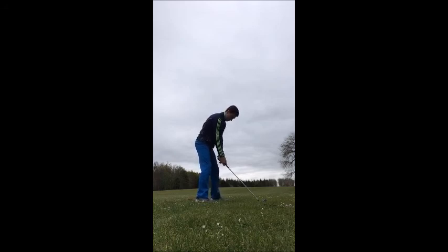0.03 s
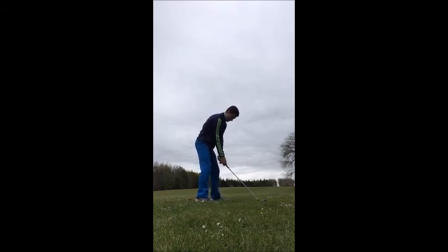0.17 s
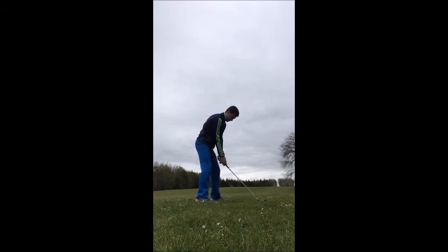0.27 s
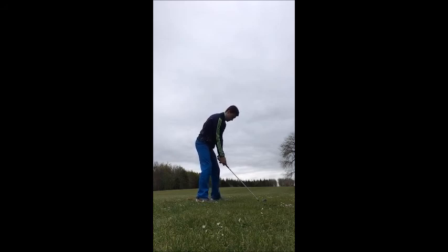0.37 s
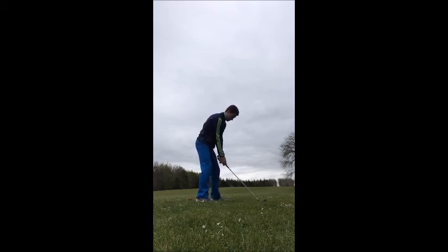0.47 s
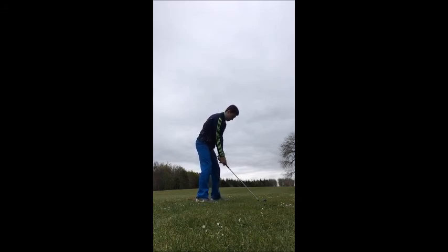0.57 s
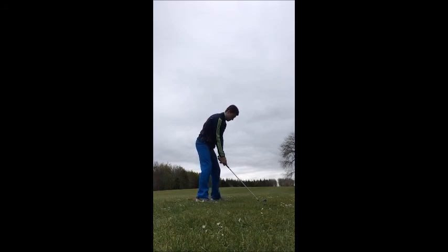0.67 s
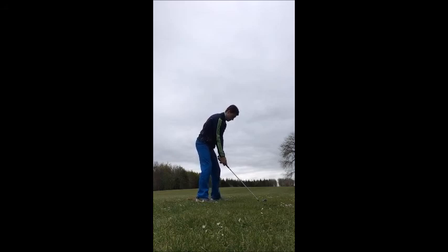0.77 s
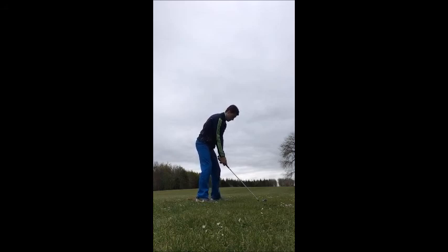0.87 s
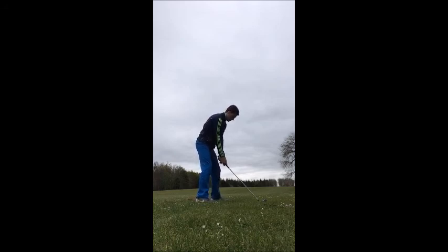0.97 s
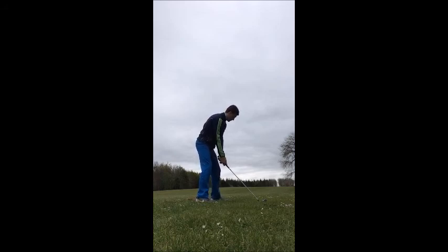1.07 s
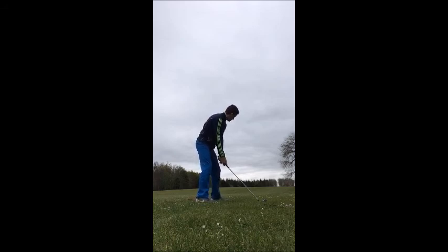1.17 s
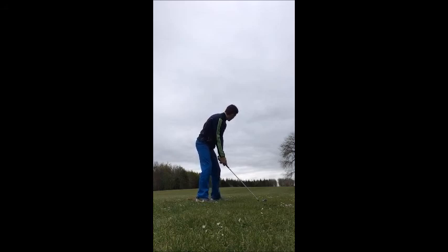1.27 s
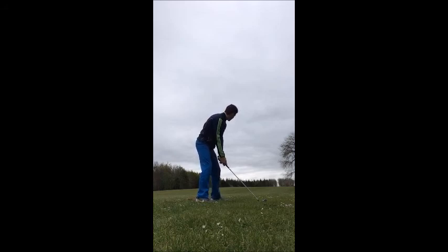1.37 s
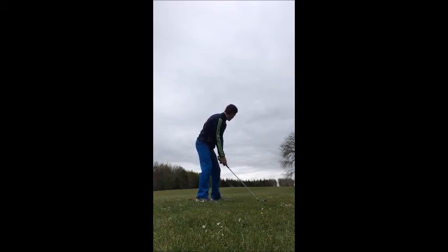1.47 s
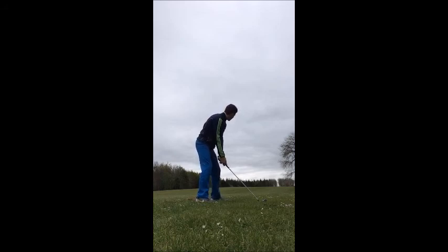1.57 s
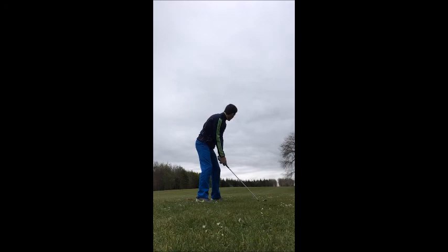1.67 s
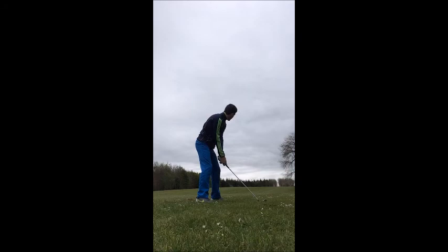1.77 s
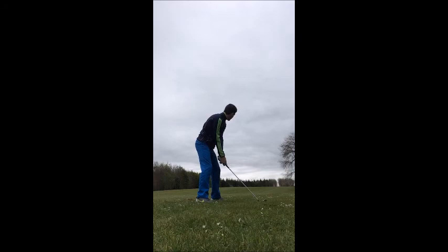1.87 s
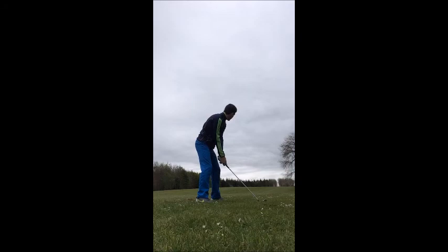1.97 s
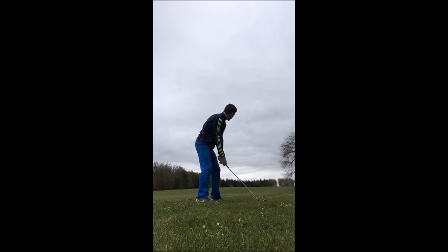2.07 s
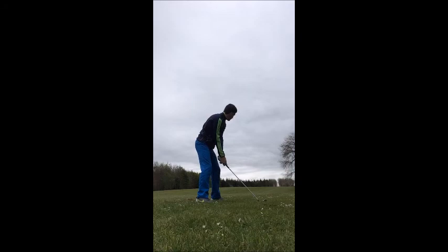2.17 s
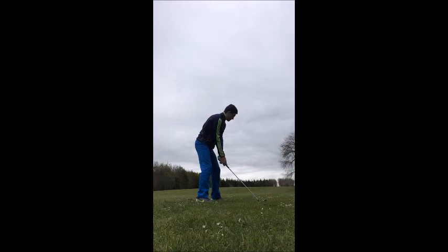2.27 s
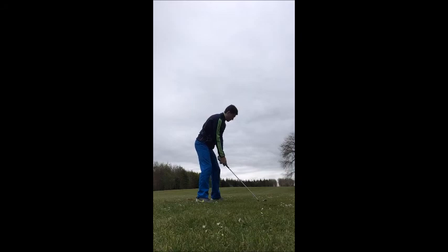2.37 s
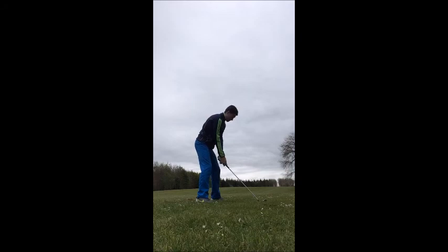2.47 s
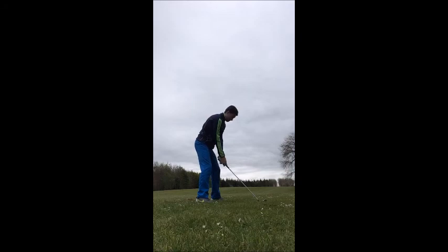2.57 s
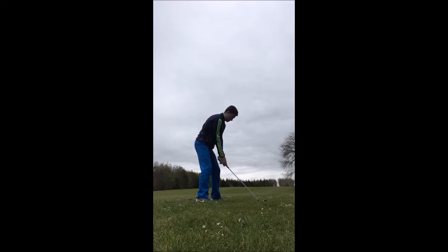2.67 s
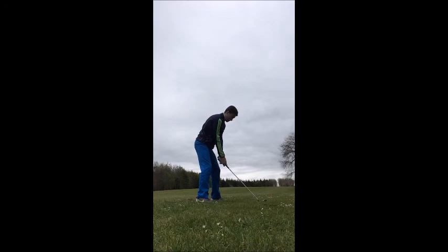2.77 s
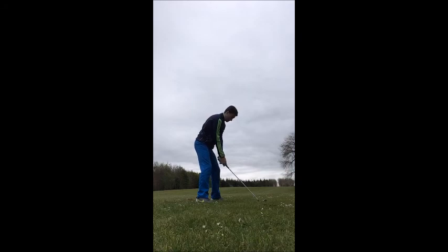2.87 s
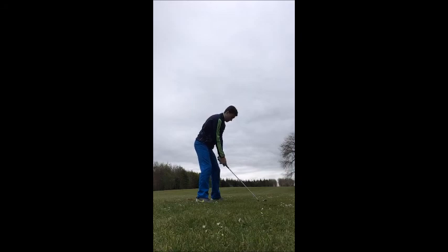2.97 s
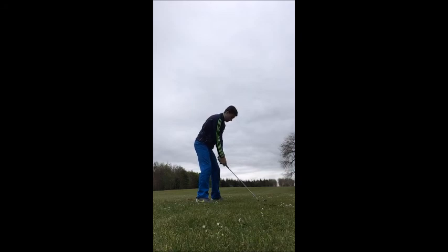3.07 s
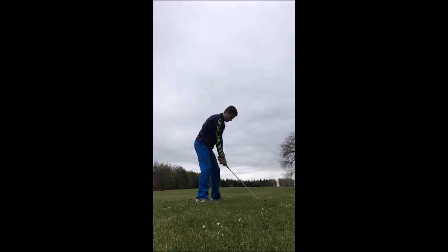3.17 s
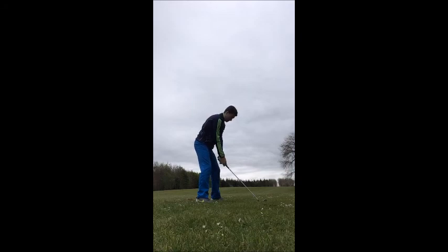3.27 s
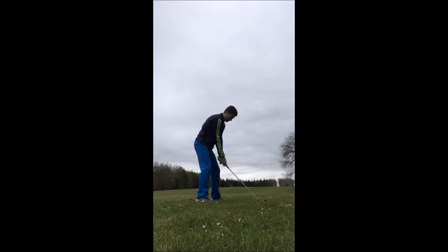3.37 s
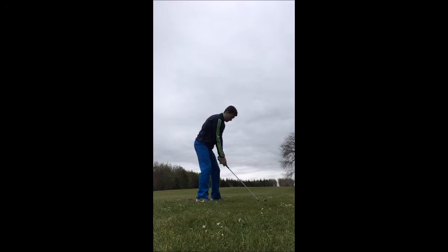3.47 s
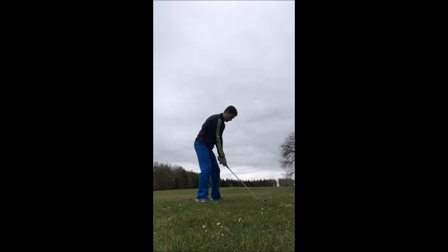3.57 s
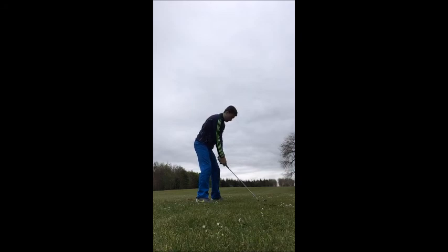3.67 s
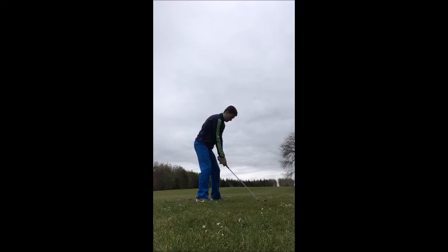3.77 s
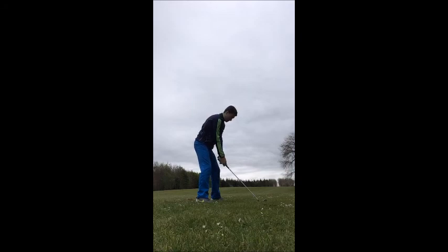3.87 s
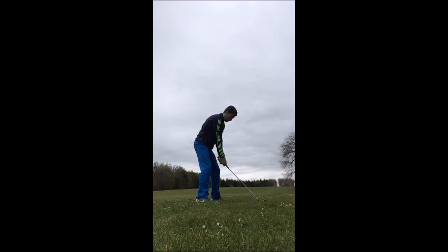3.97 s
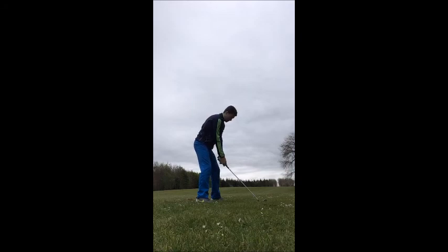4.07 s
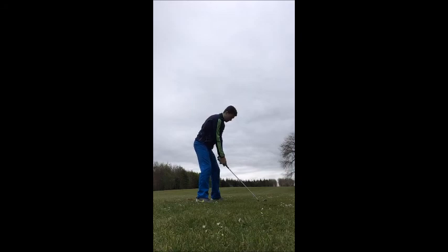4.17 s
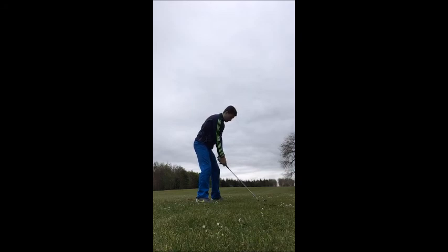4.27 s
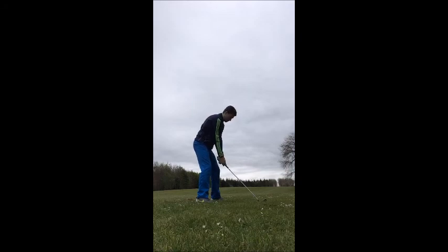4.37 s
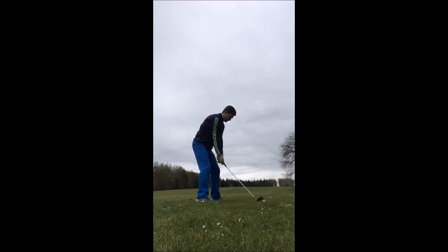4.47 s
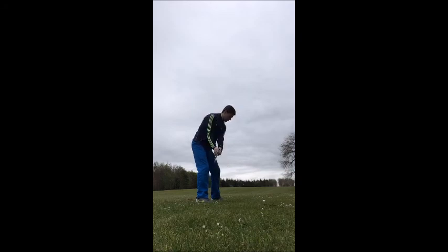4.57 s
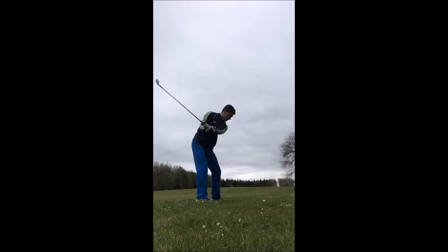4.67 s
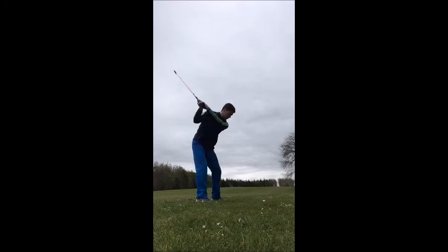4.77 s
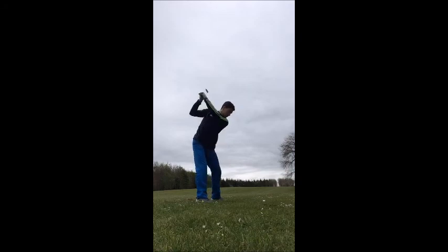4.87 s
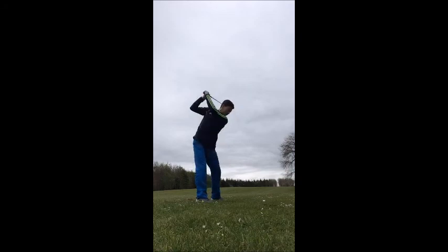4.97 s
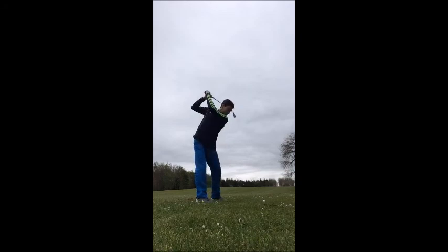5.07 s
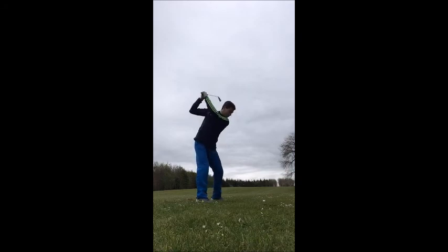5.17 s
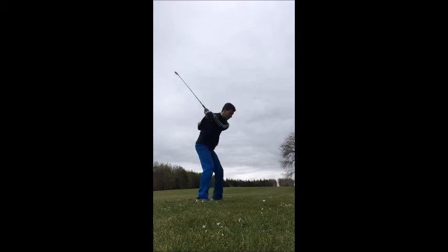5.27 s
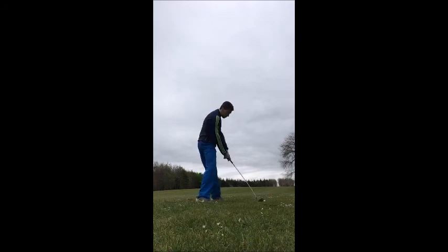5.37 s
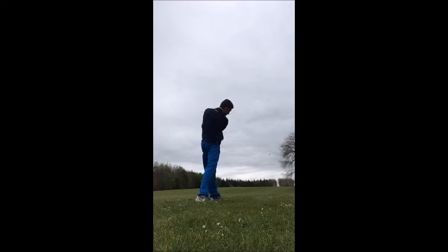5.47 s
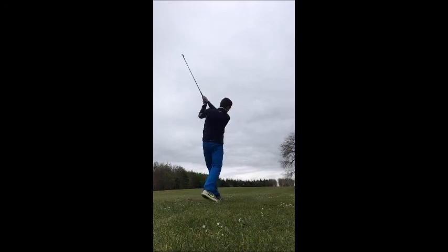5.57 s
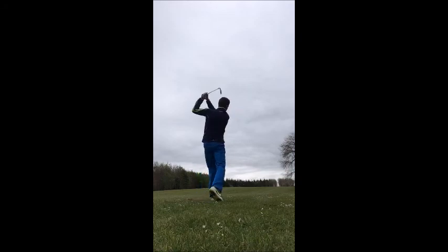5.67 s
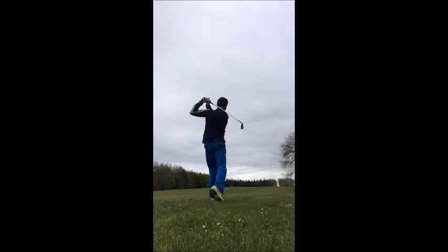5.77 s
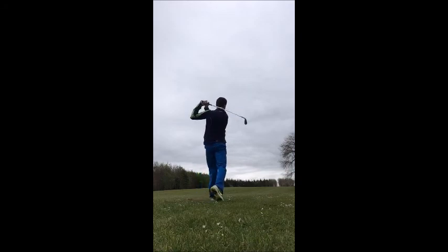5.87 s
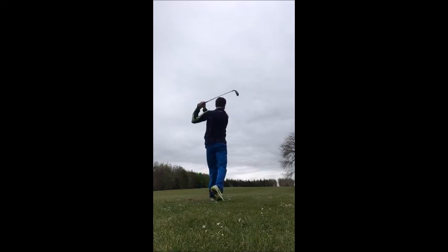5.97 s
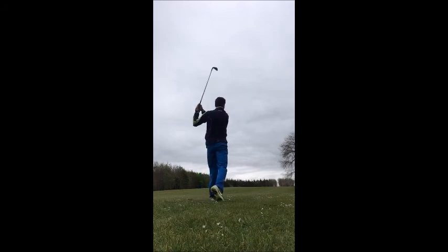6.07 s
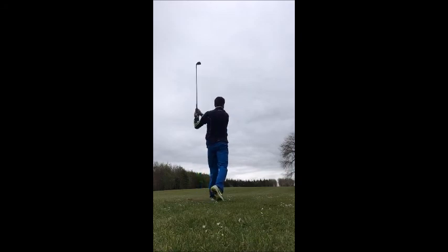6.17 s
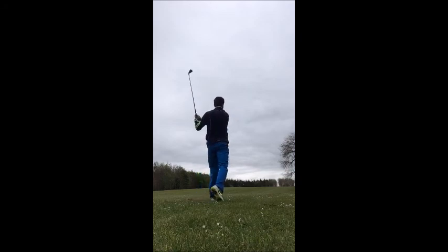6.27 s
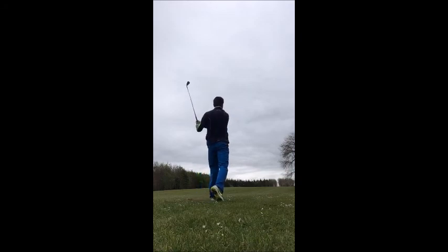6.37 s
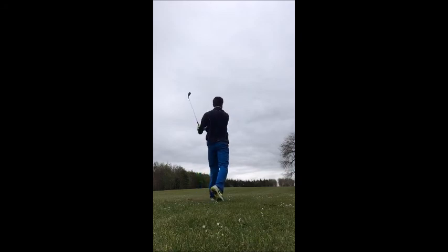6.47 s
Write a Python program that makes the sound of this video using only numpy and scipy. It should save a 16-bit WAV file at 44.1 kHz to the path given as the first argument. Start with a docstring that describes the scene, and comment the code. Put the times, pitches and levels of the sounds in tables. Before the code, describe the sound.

Distant birds chirp in light wind until a fast golf swing whistles into one hard, dry click, followed by a brief scatter of soil.

```python
"""An iron swung on an open fairway: the shaft whistles as it sheds vortices, the head hisses, and the face
cracks the ball in one pulse with a few short rings. Torn turf sprays as dense grains and patters down.
Birds sing far off at a wood's edge, as gliding sines smeared by a haze of echoes.
Light wind, a low lumpy noise, rumbles on the microphone; cloth rustles over a faint open-air hiss."""
import sys
import numpy as np
from scipy import signal
from scipy.fft import rfft, irfft
from scipy.io import wavfile
from scipy.ndimage import uniform_filter1d

SR = 44100
rng = np.random.default_rng(int(sys.argv[2]) if len(sys.argv) > 2 else 0)


def store_wav(level_fs):
    """Save 16-bit WAV to argv[1]."""
    pcm = np.round(np.clip(np.atleast_2d(level_fs), -1, 1) * 32767)
    wavfile.write(sys.argv[1], SR, pcm.T.astype(np.int16))


N = 287691


def from_db(db):
    """Amplitude of a level in dB."""
    return 10 ** (np.asarray(db) / 20)


def rms_one(x):
    """Scaled to rms 1."""
    return x / np.sqrt(np.mean(x ** 2) + 1e-20)


def in_time(rows):
    """Columns as curves; negative ones (levels) are silent before the first row and after a last row under 6.4 s."""
    t, *columns = np.transpose(rows)
    curves = []
    for c in columns:
        before = min(c[0], -140) if c[0] < 0 else c[0]
        after = min(c[-1], -140) if c[-1] < 0 and t[-1] < 6.4 else c[-1]
        curves.append(np.interp(np.arange(N) / SR, t, c, left=before, right=after))
    return curves


def colour(x, spectrum):
    """Noise filtered to a spectrum of (f/Hz, level/dB) points, then brought to rms 1."""
    hz, level_db = np.transpose(spectrum)
    bins = np.maximum(np.arange(N // 2 + 1) * SR / N, 1)
    gain = from_db(np.interp(np.log(bins), np.log(hz), level_db))
    return rms_one(irfft(rfft(x) * gain, N))


def filtered(x, hz, kind="low"):
    """Second-order Butterworth filter."""
    return signal.sosfilt(signal.butter(2, hz, kind, fs=SR, output="sos"), x)


def slow(rate_hz):
    """Low-passed random drift, rms 1; the first second, where the filter settles, is dropped."""
    return rms_one(filtered(rng.standard_normal(N + SR), rate_hz)[SR:])


def moving_band(hz, width_hz):
    """A narrow noise band whose centre follows a curve; rms 1."""
    phase = 2 * np.pi * np.cumsum(hz) / SR
    return rms_one(slow(width_hz) * np.cos(phase) + slow(width_hz) * np.sin(phase))


def ring(clicks, hz, t60):
    """A damped resonance: a unit click sets a sine of height 1 ringing, 60 dB down after t60 seconds."""
    r, w = from_db(-60 / (t60 * SR)), 2 * np.pi * hz / SR
    return signal.lfilter([0, np.sin(w)], [1, -2 * r * np.cos(w), r * r], clicks + 1e-18)


def grains(per_s, spread_db):
    """Random clicks of uneven size and either sign."""
    sizes = from_db(spread_db * np.minimum(rng.exponential(1, N), 4)) * rng.choice([-1, 1], N)
    return sizes * (rng.random(N) < per_s / SR)


def burst_db(s, hold_s, peak_db, rise, fall):
    """A level that climbs, holds and falls at given dB per second."""
    t = np.arange(N) / SR - s
    return peak_db - rise * np.maximum(-t, 0) - fall * np.maximum(t - hold_s, 0)


# faint open-air hiss, spectrum: f/Hz, level/dB per Hz
AIR_SPECTRUM = [(88, -29.5), (150, -1.5), (425, -2.5), (601, -5), (728, -7.5), (818, -7.5), (1600, -14),
                (2100, -11.5), (2700, -16), (7640, -22.5), (15000, -30.5)]
AIR_DB = -70


def open_air():
    """A faint broadband hiss from all around, almost steady."""
    return from_db(AIR_DB + 0.57 * slow(2.4)) * colour(rng.standard_normal(N), AIR_SPECTRUM)


# wind at the microphone: t/s, level/dB
WIND_LEVEL = [(0, -68.5), (3.6, -69), (4.3, -68), (4.6, -68.5), (5.15, -64.5), (5.6, -71), (6.52, -73.5)]
# its low rumble, spectrum: f/Hz, level/dB per Hz
WIND_SPECTRUM = [(12, -46), (20, -16), (34, -1.5), (59, 3), (97, 3), (160, -13), (250, -14.5), (320, -40.5),
                 (550, -120)]


def wind():
    """Light wind buffets the microphone: low noise whose level wanders."""
    return from_db(in_time(WIND_LEVEL)[0] + 3.3 * slow(6.0)) * colour(rng.standard_normal(N), WIND_SPECTRUM)


# jacket in the backswing: t/s, level/dB
JACKET_LEVEL = [(4.4, -100), (4.6, -75.5), (5.0, -78.5), (5.3, -80), (5.4, -100)]


def jacket():
    """Cloth rubs in the backswing: dense small clicks, brightest near 5 kHz."""
    cloth = colour(grains(5000., spread_db=2.5), [(2000, -8), (5000, 2.5), (9000, -3), (15000, -9)])
    return from_db(in_time(JACKET_LEVEL)[0] + 1.4 * slow(7.9)) * cloth


WOOD_SWELL_S = 0.027


def wood(x, wet_db, t60):
    """Trunks scatter a sound into a haze of echoes that swells as deeper trees answer, then dies."""
    t = np.arange(int(1.5 * SR)) / SR
    swell = 1 - np.exp(-(t / WOOD_SWELL_S) ** 2)
    haze = rng.standard_normal(len(t)) * swell * from_db(-60 * t / t60)
    return x + from_db(wet_db) * signal.fftconvolve(x, haze / np.sqrt(np.sum(haze ** 2)))[:N]


def chorus(level_db, centre_hz):
    """Many far birds: short falling chirps at random times and pitches."""
    out, u = np.zeros(N + 800), np.arange(800) / 800
    for when, high, higher, fall, size in rng.random((4000, 5)):
        a = int(when * N)
        hz = centre_hz[a] * (1 + 0.27 * (high + higher - 1)) * (1 + 0.24 * fall * (.5 - u))
        out[a:a + 800] += from_db(6.6 * size) * np.sin(np.pi * u) * np.sin(2 * np.pi * np.cumsum(hz) / SR)
    return from_db(level_db) * rms_one(out[:N])


# far trilling birds, before echoes: t/s, level/dB, centre f/Hz
TRILLS = [(1.1, -112, 3700), (1.4, -80, 3750), (2.5, -77.5, 3470), (3.0, -75, 3337), (4.1, -79, 3470),
          (4.35, -71, 3760), (5.4, -70.5, 3464), (5.95, -70.5, 3510), (6.08, -66, 3650), (6.25, -66, 3324),
          (6.52, -86, 3210)]
# bursts of far, high twitter, before echoes: t/s, peak level/dB
TWITTER_BURSTS = [(6.081, -74.5), (6.24, -74), (6.42, -76)]
TWITTER_HZ, TWITTER_SLOPE_DB_PER_S = 6020, 130


def far_crowd():
    """Crowds of far birds, trilling and twittering, blurred by the wood."""
    slope = TWITTER_SLOPE_DB_PER_S
    twitter_db = np.max([burst_db(t, 0, db, slope, slope) for t, db in TWITTER_BURSTS], axis=0)
    crowd = chorus(*in_time(TRILLS)) + chorus(twitter_db, np.full(N, TWITTER_HZ))
    return wood(crowd, wet_db=-4.5, t60=.6)


def along(length_s):
    """Share of a note's length at each sample."""
    return np.linspace(0, 1, round(length_s * SR))


def sing(notes, edge_s, flutter_db, wobble):
    """Sines along (t/s, pitch path f/Hz, level/dB) notes; moving air makes them flutter, the pitch wobbles."""
    out, edge = np.zeros(N), max(round(edge_s * SR), 1)
    bend = 1 + wobble * slow(66.0)
    for t, hz, level_db in notes:
        # averaging rounds off the starts and ends
        height = uniform_filter1d(np.pad(from_db(level_db + 0 * hz), edge), edge)
        at = slice(round(t * SR) - edge, min(round(t * SR) + len(hz) + edge, N))
        path = np.pad(hz, edge, "edge")[:len(bend[at])] * bend[at]
        out[at] += height[:len(path)] * np.sin(2 * np.pi * np.cumsum(path) / SR)
    return out * from_db(flutter_db * slow(65.0))


# far, nearly level whistles: t/s, length/s, crest f/Hz, peak level/dB
WHISTLE_NOTES = [(.05, 0.13, 2440, -81.5), (2.42, .045, 4100, -74), (.25, 0.14, 2220, -77.5),
                 (.55, 0.18, 1415, -76.5), (.75, 0.061, 3180, -75.5), (.87, .046, 2320, -70),
                 (.96, 0.13, 2400, -79), (1.05, 0.047, 2215, -72), (1.13, .23, 1450, -78),
                 (1.755, 0.13, 3400, -72.5), (1.76, 0.088, 3060, -69), (2.28, .29, 1454, -79),
                 (2.47, 0.15, 4360, -66), (2.66, 0.25, 4346, -70), (3.33, 0.16, 1438, -77.5),
                 (3.86, .18, 3164, -71), (4.15, .13, 1380, -76.5), (4.4, 0.18, 1925, -72.5),
                 (4.62, 0.31, 2117, -70), (5.0, 0.23, 2130, -64.5), (6.03, 0.067, 4434, -60),
                 (6.255, 0.2, 4363, -66.5)]
ARCH, CREST = .04, .55   # starts flat by this share of pitch, crests at this share of length
WHISTLE_ENDS_DB = -3   # at both ends, under the peak


def whistlers():
    """Far whistles: sines on a shallow pitch arch, swelling in the middle, echoed by the wood."""
    notes = []
    for t, length, hz, db in WHISTLE_NOTES:
        u = along(length)
        arch = 1 - ARCH * (u / CREST - 1) ** 2
        notes.append((t, hz * arch, db + WHISTLE_ENDS_DB * (2 * u - 1) ** 2))
    return wood(sing(notes, .04, flutter_db=3.0, wobble=.012), wet_db=-2.0, t60=0.56)


# slurred notes: t/s, length/s, start f/Hz, end f/Hz, level/dB, singer
SLURRED_NOTES = [(1.212, .042, 3640, 3600, -65, "chatter"), (1.395, .014, 3800, 4100, -55, "chatter"),
                 (1.465, .035, 3700, 4050, -65, "chatter"), (2.653, .075, 3620, 2870, -57, "chatter"),
                 (2.745, .022, 3250, 3500, -63, "chatter"), (2.8, .05, 3480, 2970, -60.5, "chatter"),
                 (2.925, .035, 3200, 2870, -65, "chatter"), (3.13, .06, 3300, 3900, -73, "chatter"),
                 (3.158, .013, 6600, 8250, -68, "high"), (3.44, .03, 4600, 6150, -66, "high"),
                 (3.63, .03, 3960, 4140, -63, "high"), (3.73, .1, 4025, 4005, -66, "high"),
                 (3.85, .079, 4140, 4110, -74, "high"), (5.31, .06, 7780, 7520, -78, "high")]


def slurs(who):
    """One singer's straight glides from pitch to pitch."""
    return [(t, a_hz + (b_hz - a_hz) * along(length), db)
            for t, length, a_hz, b_hz, db, singer in SLURRED_NOTES if singer == who]


# chattered chirps, each gliding to a low pitch: t/s, length/s, start f/Hz, level/dB
CHIRP_NOTES = [(1.254, 0.021, 3800, -61.5), (1.288, 0.023, 4300, -70), (1.313, .018, 3690, -67),
               (1.369, 0.018, 4050, -59), (1.412, 0.034, 4100, -60), (1.492, 0.012, 3530, -61.5),
               (1.56, .013, 4200, -59.5), (1.602, 0.0082, 3840, -63), (1.626, 0.0165, 4040, -62),
               (1.634, 0.0134, 3950, -66), (1.696, .022, 4200, -63.5), (2.625, 0.0246, 3600, -59),
               (2.768, .02, 3485, -64)]
# SAG over 1: the fall slows towards the end
CHIRP_END_HZ, CHIRP_END_SPREAD_HZ, CHIRP_SAG = 2906, 230, 1.704
# weak chirps at random between the loud ones
FILL_FROM_S, FILL_TO_S, FILL_DB = 1.27, 1.72, -71
FILL_LOW_HZ, FILL_HIGH_HZ, FILL_FALL_HZ = 3600, 5100, 600
# the chatterer's own bush thickens each chirp: delay/s, level/dB
BUSH_ECHOES = [(.004, -8), (.009, -10.5)]


def chatterer():
    """A chattering bird: short falling sines, thickened by the twigs around it, then by the wood."""
    notes = slurs("chatter")
    for t, length, hz, db in CHIRP_NOTES:
        end_hz = CHIRP_END_HZ + CHIRP_END_SPREAD_HZ * (rng.random() - .5)
        notes.append((t, end_hz + (hz - end_hz) * (1 - along(length)) ** CHIRP_SAG, db))
    for when, high, size in rng.random((22, 3)):
        start_hz = FILL_LOW_HZ + (FILL_HIGH_HZ - FILL_LOW_HZ) * high ** 2
        t = FILL_FROM_S + (FILL_TO_S - FILL_FROM_S) * when
        notes.append((t, start_hz - FILL_FALL_HZ * along(0.0148), FILL_DB - 8 * size))
    chatter = sing(notes, 0.0085, flutter_db=2.5, wobble=0.019)
    echoes = sum(from_db(db) * np.roll(chatter, round(lag * SR)) for lag, db in BUSH_ECHOES)
    return wood(chatter + echoes, wet_db=-6.0, t60=1.0)


RISE_S, PLUNGE_S, SETTLE_S, TAIL_S = 0.021, .029, 0.016, .047
RISE_FROM, RISE_DB = .84, -4.5   # start pitch as share of the top; level under the peak


def swoop(t, top_hz, bottom_hz, settled_hz, peak_db):
    """A soft rise, a plunge, a settling tail."""
    rise = top_hz * (1 - (1 - RISE_FROM) * (1 - along(RISE_S)) ** 2)
    plunge = bottom_hz + (top_hz - bottom_hz) * np.cos(np.pi / 2 * along(PLUNGE_S)) ** 2
    tail = settled_hz + (bottom_hz - settled_hz) * np.exp(-(along(TAIL_S) * TAIL_S / SETTLE_S) ** 2)
    path = np.concatenate([rise, plunge, tail])
    return t - RISE_S, path, peak_db + RISE_DB * (np.arange(len(path)) < len(rise))


# swoops, up, plunging, then settling: t/s at the top, top f/Hz, bottom f/Hz, settled f/Hz, peak level/dB
SWOOP_NOTES = [(2.88, 7760, 4680, 4840, -66.5), (3.199, 7830, 5180, 5550, -64.5),
               (3.371, 6020, 4170, 4490, -61)]
# hooked notes: t/s, length/s, reference f/Hz, level/dB
HOOK_NOTES = [(2.726, .059, 7300, -72.5), (3.051, 0.055, 7400, -67)]
# the hook, up, down, up and slightly down: share of length, share of reference pitch
HOOK_PATH = [(0, 0.62), (.25, .89), (.45, .78), (.75, .97), (1, 0.89)]
# notes bending away and back: t/s, length/s, rim f/Hz, turning f/Hz, level/dB
DIP_NOTES = [(1.986, 0.044, 6880, 6220, -62.5), (2.05, .055, 7550, 6970, -67.5),
             (2.171, 0.074, 7850, 7500, -67.5), (2.29, .045, 8000, 7520, -71),
             (2.335, .07, 7770, 7030, -70.5), (2.45, 0.081, 8120, 7550, -70.5),
             (3.552, .022, 4530, 5430, -61), (3.575, 0.062, 3950, 3410, -61.5),
             (3.67, 0.096, 3800, 3370, -64)]


def high_singer():
    """A high, agile bird: swooping, hooked, bending and slurred sines, with a long haze from the wood."""
    notes = [swoop(*row) for row in SWOOP_NOTES] + slurs("high")
    for t, length, hz, db in HOOK_NOTES:
        notes.append((t, hz * np.interp(along(length), *np.transpose(HOOK_PATH)), db))
    for t, length, rim_hz, turn_hz, db in DIP_NOTES:
        notes.append((t, turn_hz + (rim_hz - turn_hz) * (2 * along(length) - 1) ** 2, db))
    return wood(sing(notes, 0.0037, flutter_db=3.0, wobble=0.01), wet_db=0.5, t60=0.94)


def birds():
    """All the birds at the wood's edge."""
    return far_crowd() + whistlers() + chatterer() + high_singer()


STRIKE_S = 5.51325   # first touch of face and ball

# bursts of torn turf: t/s, hold/s, fine spray level/dB, clods level/dB
TURF_BURSTS = [(5.53, .03, -58.5, -55), (5.583, 0.024, -48, -50), (5.612, 0.032, -49.5, -55.5),
               (5.645, .006, -51, -49), (5.663, 0.022, -55.5, -44.5), (5.695, .004, -53, -46),
               (5.72, .004, -51, -43), (5.75, .005, -64, -56.5)]
BURST_RISE_DB_PER_S, SPRAY_FALL_DB_PER_S, CLODS_FALL_DB_PER_S = 1199.5, 492, 309
# faint patter from the strike on
PATTER_END_S, PATTER_SPRAY_DB, PATTER_CLODS_DB, PATTER_FADE_DB_PER_S = 5.95, -66.5, -65, 61
# fine spray, spectrum: f/Hz, level/dB per Hz
SPRAY_SPECTRUM = [(700, -32), (1400, -7.5), (3400, -4), (6500, -8.5), (9000, -18), (15000, -30)]
# clods, spectrum: f/Hz, level/dB per Hz
CLODS_SPECTRUM = [(59, -39), (100, -18.5), (183, -4), (767, -2.5), (868, -2), (1090, 0), (4000, -21),
                  (5200, -51.5), (8800, -120)]


def turf_level(column, fall, patter_floor_db):
    """Loudest of the bursts and the faint patter at each moment, in dB."""
    bursts = [burst_db(row[0], row[1], row[column], BURST_RISE_DB_PER_S, fall) for row in TURF_BURSTS]
    patter = burst_db(STRIKE_S, PATTER_END_S - STRIKE_S, patter_floor_db,
                      BURST_RISE_DB_PER_S, PATTER_FADE_DB_PER_S)
    return np.max(bursts + [patter], axis=0)


def spray():
    """Fine soil hisses: very dense grains of nearly even size."""
    level_db = turf_level(2, SPRAY_FALL_DB_PER_S, PATTER_SPRAY_DB)
    return from_db(level_db + 1.9 * slow(60.0)) * colour(grains(8000., spread_db=0.5), SPRAY_SPECTRUM)


def clods():
    """Clods patter lower, in sparser grains of uneven size."""
    level_db = turf_level(3, CLODS_FALL_DB_PER_S, PATTER_CLODS_DB)
    return from_db(level_db + 1.7 * slow(70.0)) * colour(grains(2600., spread_db=3.5), CLODS_SPECTRUM)


# single crumbs landing: t/s, level/dB of the click
CRUMB_LANDINGS = [(5.76, -56), (5.958, -57), (6.025, -49)]


def crumbs():
    """A few crumbs tick alone, each click ringing two short resonances."""
    clicks = np.zeros(N)
    for t, level_db in CRUMB_LANDINGS:
        clicks[round(t * SR)] = from_db(level_db)
    return ring(clicks, 1000, 0.0051) + ring(clicks, 1810, 0.0086)


SHAFT_M, SHAFT_WIDTH_HZ = .012, 100   # shaft diameter; width of its tone


def shaft_whistle(speed, shaft_db):
    """The shaft sheds vortices at .2 speed / diameter, a narrow band that follows its speed."""
    return from_db(shaft_db) * moving_band(.2 * speed / SHAFT_M, SHAFT_WIDTH_HZ)


HEAD_WIDTH_HZ = 1600
HEAD_DB, HEAD_POWER, HEAD_TOP_DB = -38, 6.8, -45   # level at full speed, power of speed, ceiling
HEAD_PAST_DB = -22.5   # drop as the head meets the grass


def head_hiss(share, head_hz, past):
    """The head hisses higher than the shaft, louder with speed up to a ceiling, until it meets the grass."""
    height = np.minimum(from_db(HEAD_DB) * share ** HEAD_POWER, from_db(HEAD_TOP_DB))
    return height * from_db(HEAD_PAST_DB * past) * moving_band(head_hz, HEAD_WIDTH_HZ)


PAST_S = 0.018   # the head's sound drops over this time up to the strike
# broad rush of air, spectrum: f/Hz, level/dB per Hz
RUSH_SPECTRUM = [(100, -16.5), (300, -4.5), (700, -6), (1150, 0.5), (1500, -1.5), (5400, -15.5),
                 (9000, -19), (15000, -31.5)]
RUSH_DB, RUSH_POWER = -30.5, 5   # level at full speed before the turf's copy, power of speed
RUSH_SPLIT_HZ = 3000   # above this the rush belongs to the head and drops with its hiss
BRIGHT_PAST_DB, RUSH_PAST_DB = -6.5, -10.5   # bright part as the head meets the grass; all after the ball
GROUND_SHARE = .65


def air_rush(share, head_hz, past):
    """Broad turbulence grows with speed; its copy off the turf puts climbing ridges in it."""
    after_ball = np.roll(past, round(PAST_S * SR))
    height = from_db(RUSH_DB + RUSH_PAST_DB * after_ball) * share ** RUSH_POWER
    rush = height * colour(rng.standard_normal(N), RUSH_SPECTRUM)
    # the copy comes one hiss period late, so the ridges climb with the hiss pitch
    rush = rush + GROUND_SHARE * np.interp(np.arange(N) - SR / head_hz, np.arange(N), rush)
    low = filtered(rush, RUSH_SPLIT_HZ)
    return low + (rush - low) * from_db(BRIGHT_PAST_DB * past)


SWISH_S, SWISH_HZ, SWISH_DB, SWISH_SLOPE_DB_PER_S = 5.3, 930, -65, 132.5


def downswing_swish():
    """A soft low swish as the downswing starts: a noise band that swells and fades."""
    level_db = burst_db(SWISH_S, 0, SWISH_DB, SWISH_SLOPE_DB_PER_S, SWISH_SLOPE_DB_PER_S)
    return from_db(level_db) * moving_band(np.full(N, SWISH_HZ), 500.0)


# the swing: t/s, shaft speed/(m/s), shaft tone level/dB
SWING_PATH = [(5.25, 13.6, -84), (5.39, 18.2, -71), (5.43, 26.4, -51), (5.46, 34, -37), (5.49, 42.5, -36),
              (5.51, 57.3, -39.5), (5.525, 44, -33), (5.545, 45.5, -52.5), (5.58, 33, -59),
              (5.62, 13, -100)]
FULL_SPEED = 50   # m/s
HEAD_HZ, HEAD_HZ_POWER = 5810, 1.9   # hiss pitch at full speed, growing as a power of speed


def swing():
    """One speed curve drives whistle, hiss and rush while the club moves; a low swish leads in."""
    speed, shaft_db = in_time(SWING_PATH)
    share = speed / FULL_SPEED
    head_hz = HEAD_HZ * share ** HEAD_HZ_POWER
    # 0 before the grass, 1 from the strike on
    past = np.clip((np.arange(N) / SR - STRIKE_S) / PAST_S + 1, 0, 1)
    moving = shaft_db > -120
    head = head_hiss(share, head_hz, past) + air_rush(share, head_hz, past)
    return shaft_whistle(speed, shaft_db) + moving * head + downswing_swish()


# the steel face at first touch: f/Hz, level/dB, t60/s
FACE_MODES = [(5240, -25, 0.012), (5460, -27.5, 0.015), (7540, -15, 0.0037), (8430, -31, 0.012),
              (13500, -25.5, .004)]
SOLE_LEAD_S, SOLE_HZ, SOLE_DB = .0068, 11530, -29.5


def face_tick(click):
    """The steel face rings at first touch; the sole flicks the grass just before."""
    tick = sum(from_db(level_db) * ring(click, hz, t60) for hz, level_db, t60 in FACE_MODES)
    flick = np.roll(click, -round(SOLE_LEAD_S * SR))
    return tick + from_db(SOLE_DB) * ring(flick, SOLE_HZ, 0.0017)


SQUEEZE_S, SQUEEZE_DELAY_S, SQUEEZE_DB = .000165, .00065, 0.5


def squeeze_pulse(t):
    """The squeezed ball sends one pulse: a smooth push radiates its curvature."""
    u = np.clip((t - SQUEEZE_DELAY_S) / SQUEEZE_S, -9, 9)
    return from_db(SQUEEZE_DB) * (1 - u ** 2) * np.exp(-u ** 2 / 2)


# the ball and head ringing free once they part: f/Hz, level/dB, t60/s
FREE_MODES = [(377, -30, .06), (700, -25, .04), (1055, -11, .03), (1382, -11, .028), (2450, -24, .018),
              (2900, -27, .018)]
RELEASE_S = .00135   # from first touch to parting
GROUND_ECHO_S, GROUND_ECHO_DB = .00303, -8.0


def free_rings(click):
    """Ball and head ring with alternating signs as they part, and again off the turf."""
    parting = np.roll(click, round(RELEASE_S * SR))
    rings = sum((-1) ** k * from_db(level_db) * ring(parting, hz, t60)
                for k, (hz, level_db, t60) in enumerate(FREE_MODES))
    return rings + from_db(GROUND_ECHO_DB) * np.roll(rings, round(GROUND_ECHO_S * SR))


CRACK_DB, CRACK_T60_S = -22.5, 0.026   # start of the fade, before the band filter's loss


def crack(t):
    """A bright noise burst from first touch, dying fast."""
    noise = filtered(rng.standard_normal(N), [2200, 15000], "band")
    return noise * (t > 0) * from_db(CRACK_DB - 60 * np.abs(t) / CRACK_T60_S)


# the strike back from the trees: delay/s, level/dB
TREE_RETURNS = [(.074, -29), (.086, -30), (.097, -29), (.108, -32), (.24, -38), (.335, -42)]


def strike():
    """Tick, pulse, rings and crack of the hit; the trees answer in a narrow band."""
    t = np.arange(N) / SR - STRIKE_S
    click = np.zeros(N)
    click[round(STRIKE_S * SR)] = 1
    hit = face_tick(click) + squeeze_pulse(t) + free_rings(click) + crack(t)
    narrow = filtered(hit, [1250, 1550], "band")
    return hit + sum(from_db(level_db) * np.roll(narrow, round(lag * SR)) for lag, level_db in TREE_RETURNS)


def scene():
    """Everything reaches one microphone."""
    background = open_air() + wind() + jacket() + birds()
    turf = spray() + clods() + crumbs()
    return (background + turf + swing() + strike())[None, :]


CUTOFF_HZ = 15350


def record(dry):
    """The loudest peak flattens smoothly below .95, the top is cut steeply."""
    flat = dry / (1 + (np.abs(dry) / .95) ** 6) ** (1 / 6)
    return signal.sosfilt(signal.ellip(12, .5, 85, CUTOFF_HZ, fs=SR, output="sos"), flat)


dry = scene()
out = record(dry)
store_wav(out)
```